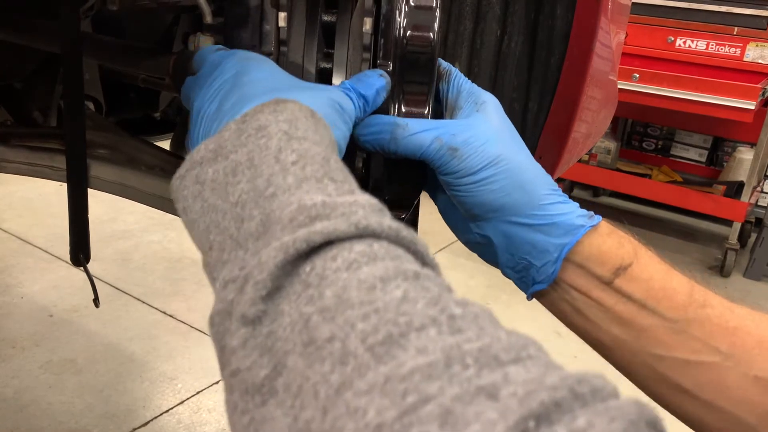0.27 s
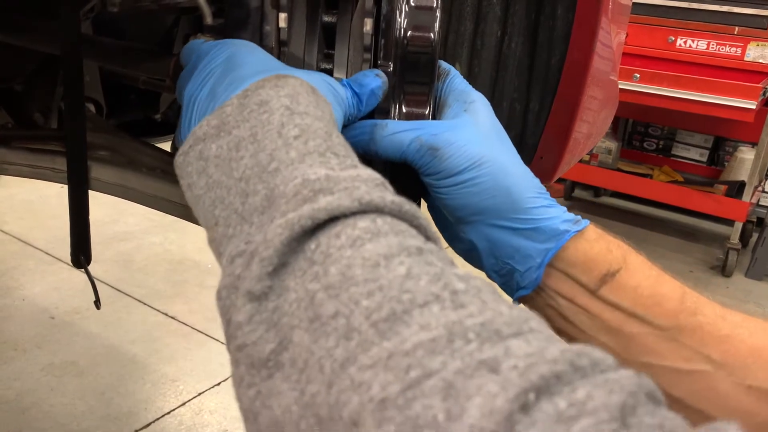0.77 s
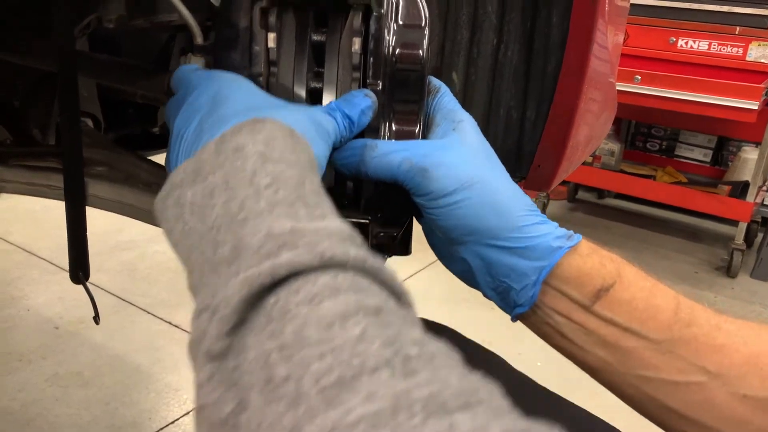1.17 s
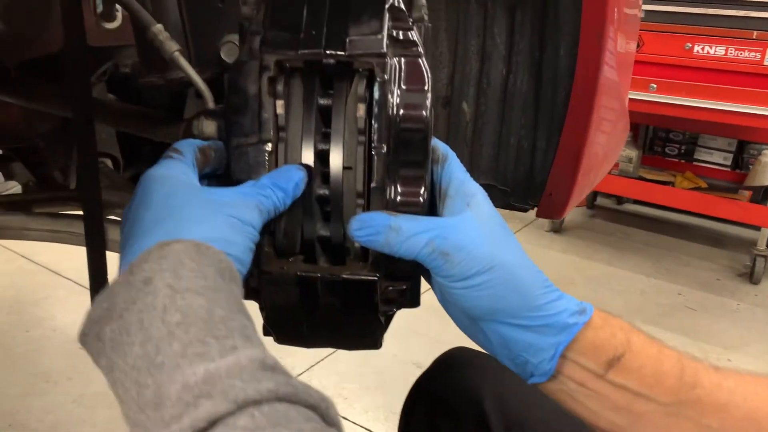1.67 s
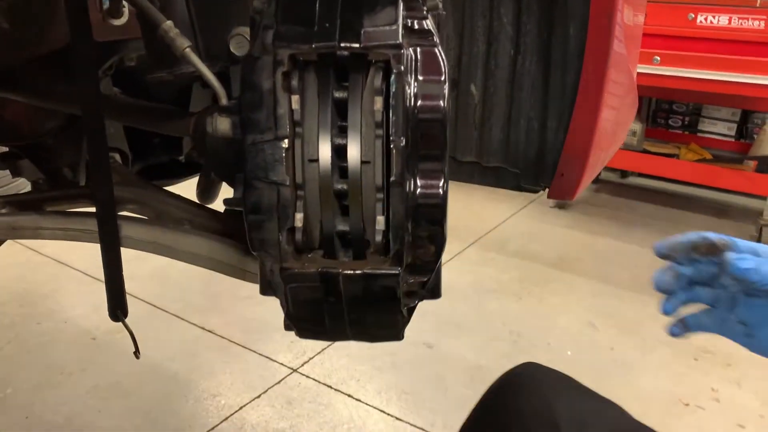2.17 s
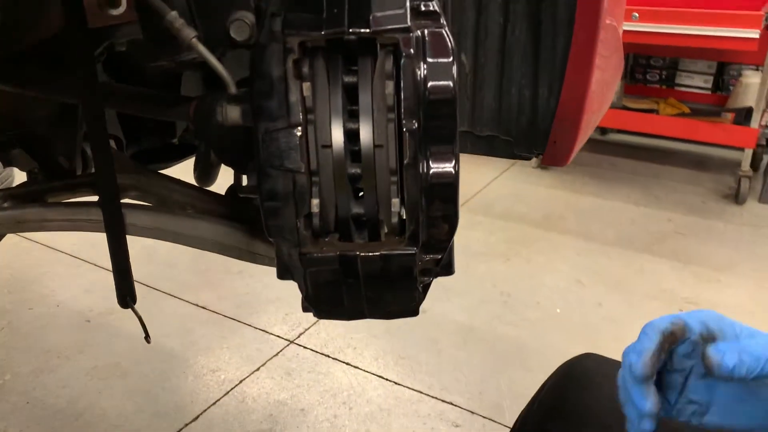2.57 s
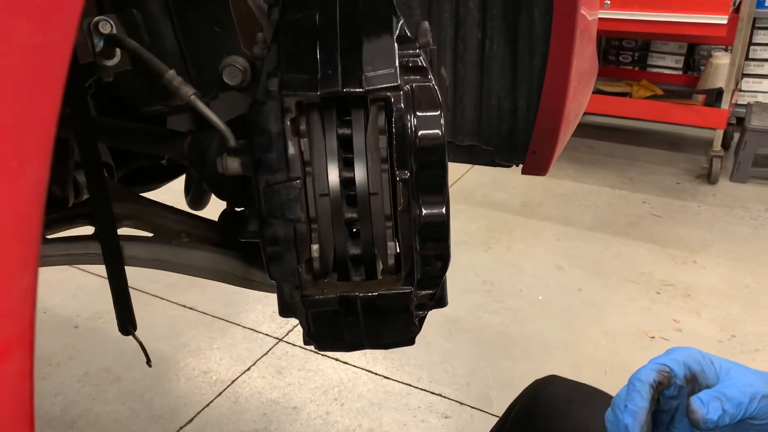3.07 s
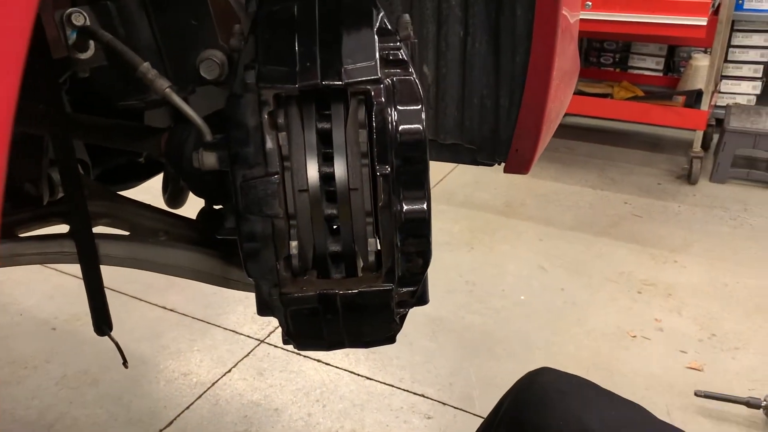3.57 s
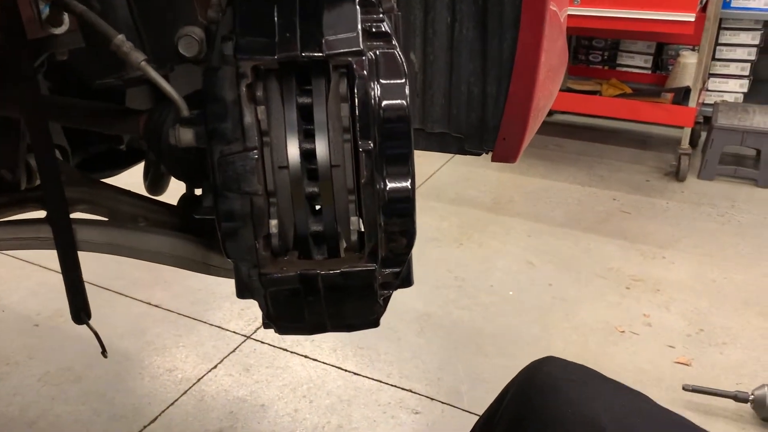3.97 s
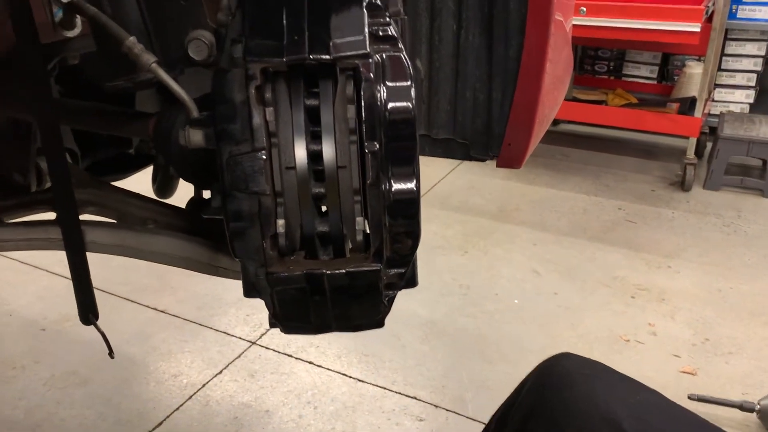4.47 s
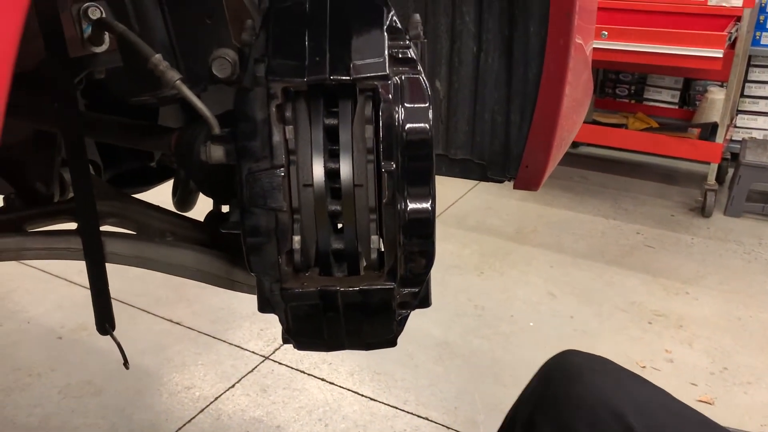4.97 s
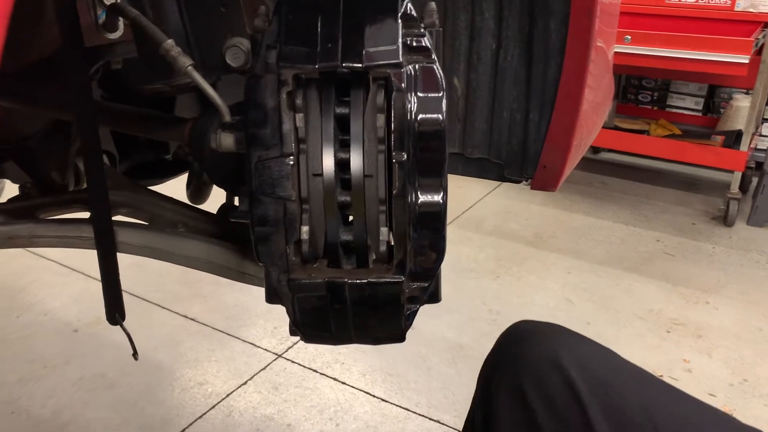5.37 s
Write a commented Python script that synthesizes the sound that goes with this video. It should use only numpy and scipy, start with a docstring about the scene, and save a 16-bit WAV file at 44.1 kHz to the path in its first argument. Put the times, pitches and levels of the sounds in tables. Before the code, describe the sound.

In a quiet, hard-walled garage with low ventilation hum, small spring ticks come first, then rubbery glove rubbing, a brief scrape and a low clunk as a brake pad seats. Clothing rustles and bumps near the microphone; a pin pings loudly, tools knock, a punch clinks, and sharp steel clacks near the end give way to more cloth movement.

```python
"""Brake pads and steel tools in a workshop

Gloved hands rub on brake pads and seat them in a caliper, then handle steel tools and hardware.
Metal parts ping, knock and clink as decaying modes excited by noisy impacts; sliding parts and cloth
are trains of unequal stick-slip contacts, and the body shifts and bumps as muffled noise nearby.
Early echoes and a diffuse tail form the hard-walled room; ventilation is shaped noise with low lines."""
import sys
import numpy as np
from scipy import signal
from scipy.fft import rfft, irfft
from scipy.io import wavfile
from scipy.ndimage import uniform_filter1d, map_coordinates

SR = 44100
rng = np.random.default_rng(int(sys.argv[2]) if len(sys.argv) > 2 else 0)


def dump(signal):
    """Clip the signal to [-1, 1] and save it as 16-bit WAV at the path in sys.argv[1]."""
    limited = np.clip(np.atleast_2d(signal).T, -1, 1)
    pcm = np.round(limited * 32767).astype(np.int16)
    wavfile.write(sys.argv[1], SR, pcm)


N = 247311
T = np.arange(N) / SR  # scene time, s
AGE = T[:SR * 3 // 4]  # time since a contact, s

# modes of a small steel pin [f/Hz, energy/dB, t60/s]
PIN_MODES = [(8090, -21, .04), (8260, -21, .1), (15268, 0, .17), (15370, -6, .16), (15545, -5, .12),
             (15615, -3, .09)]
# impact spectrum of the pin [f/Hz, level/dB]
PIN_CRACK = [(1000, -42), (3200, -20), (6000, -25.5), (8100, 10), (9000, -8), (10500, -3.5), (12200, 1.5),
             (14000, -5), (15600, 2.5), (17000, -40)]
# modes of a tool handle [f/Hz, energy/dB, t60/s]
HANDLE_MODES = [(1500, -3, .03), (1640, 0, .045), (1765, 0, .05), (1910, -2, .08), (2200, -4, .04),
                (2446, -1, .14), (2767, -4, .05), (3130, -4, .05), (3260, -3, .05), (3580, -7, .06),
                (4315, -14, .22), (5800, -15, .24)]
# impact spectrum of the handle [f/Hz, level/dB]
HANDLE_CRACK = [(250, -15), (800, -7), (1200, -7.5), (1600, 2.5), (2300, -4.5), (3200, -4.5), (4000, -9.5),
                (5700, -10), (7400, -28.5), (16000, -78.5)]
# modes of a steel punch [f/Hz, energy/dB, t60/s]
PUNCH_MODES = [(1583, -14, .12), (2444, -15, .12), (3074, -11, .6), (3092, -12, .3), (3592, -9, .06),
               (3780, -10, .06), (3965, -8, .07), (4304, -2, .3), (4996, -18, .25), (6110, -11.5, .27),
               (10860, -11, .11), (11690, -10, .12)]
# impact spectrum of the punch [f/Hz, level/dB]
PUNCH_CRACK = [(250, -13), (600, -8), (1200, -12), (2000, -1), (3300, 3.5), (5000, -1), (8000, -4.5),
               (10000, -7), (12000, 4.5), (14500, -13), (16000, -27)]
# muffled spectrum of body contact [f/Hz, level/dB]
BODY = [(28, -31), (60, -11), (95, 2), (157, -.5), (210, -9.5), (300, -8.5), (500, -10), (780, -13.5),
        (1000, -25.5), (1500, -25.5), (3000, -67)]


def undb(db):
    """Logarithmic level: decibels become an amplitude gain."""
    return 10 ** (np.asarray(db) / 20)


def unit(x):
    """Power normalisation: scale to rms 1."""
    return x / np.sqrt(np.mean(x ** 2))


def unit_energy(x):
    """Energy normalisation: scale the sum of squares to 1."""
    return x / np.sqrt(np.sum(x ** 2))


def colour(x, points, tilt_db=0, size=4096):
    """Minimum-phase filtering through (f/Hz, level/dB) points, tilted by dB per octave."""
    hz, db = np.transpose(points)
    octave = np.log2(np.maximum(np.arange(size // 2 + 1) * SR / size, 1))
    tilted_db = db + tilt_db * np.log2(hz / hz[0])
    gain = undb(np.interp(octave, np.log2(hz), tilted_db))
    # folding the cepstrum onto positive time makes the filter causal
    cepstrum = irfft(np.log(gain))
    cepstrum[1:size // 2] *= 2
    cepstrum[size // 2 + 1:] = 0
    response = irfft(np.exp(rfft(cepstrum)))
    return signal.fftconvolve(x, response)[:len(x)]


def walk(rate):
    """Low-pass random modulation: steps at a rate in Hz, smoothed twice, with a spread near 1."""
    k = int(SR / rate)
    steps = np.repeat(rng.standard_normal(N // k + 1), k)
    return unit(uniform_filter1d(uniform_filter1d(steps, k), k)[:N])


def grains(n, spread_db):
    """Impulsive friction noise: dense tiny contacts of very unequal size."""
    size_db = spread_db * np.minimum(rng.exponential(size=n), 5)
    return unit(rng.standard_normal(n) * undb(size_db))


def add(track, s, sound):
    """Linear superposition: mix a sound in at time s."""
    i = int(s * SR)
    track[i:i + len(sound)] += sound[:N - i]


def peak_at(x, db, size=128):
    """Short-time level: set the loudest 3 ms to db."""
    return x * undb(db) / np.sqrt(uniform_filter1d(x ** 2, size).max())


def fade(t60):
    """Exponential decay: amplitude falls 60 dB in t60 seconds."""
    return np.exp(-np.log(1000) * AGE / max(t60, .001))


def ring(modes):
    """Modal superposition: damped sines whose energy shares vary a little with the contact point."""
    total = 0
    for hz, db, t60 in modes:
        gain = undb(db + rng.normal())
        sine = np.sin(2 * np.pi * hz * AGE + rng.uniform(0, 2 * np.pi))
        total = total + gain * unit_energy(sine * undb(-60 * AGE / t60))
    return unit_energy(total)


def resonance(x, hz, share):
    """Cavity resonance: two equal resonators in cascade steepen the skirts."""
    b, a = signal.iirpeak(hz, 1 / np.clip(share, .03, 1), fs=SR)
    return signal.lfilter(b, a, signal.lfilter(b, a, x))


def waver(x):
    """Varying resonator size: a fold of cloth or rubber changes as it moves, so its pitch wanders."""
    wander = 0.09  # rms share of the playing speed
    return map_coordinates(x, [np.cumsum(1 + wander * walk(25))], order=3, mode="mirror")


def speed(s, rise, fall):
    """Limb kinematics: a limb gathers speed, is fastest (1) at time s and slows again."""
    drop_db, curve = 16, 1.315  # level lost over one rise or fall time; roundness of the crest
    away = np.maximum((s - T) / max(rise, .005), (T - s) / max(fall, .005))
    return undb(-drop_db * np.minimum(away, 10) ** curve)


def blows(rows, modes, crack, ring_db, snap_db, snap_t60, rise_s):
    """Impact excitation: a snap and a chatter of micro-bounces ring the part; harder contact is brighter."""
    out = np.zeros(N)
    for s, db, chatter_t60, *extra in rows:
        own_ring_db, tilt_db = (*extra, 0, 0)[:2]
        envelope = fade(chatter_t60) + undb(snap_db) * fade(snap_t60)
        contact = grains(len(AGE), 1.34) * envelope
        excited = [(hz, level + tilt_db * np.log2(hz / modes[0][0]), t60) for hz, level, t60 in modes]
        impact = unit_energy(colour(contact, crack, tilt_db / 2))
        sound = impact + undb(ring_db + own_ring_db) * ring(excited)
        # a softer contact builds up more slowly
        add(out, s, peak_at(sound * (1 - np.exp(-AGE / rise_s)), db))
    return out


def strokes(rows, spread_db, edge):
    """Stick-slip friction: a sliding part catches unevenly; edge is the share of tapering."""
    out = np.zeros(N)
    for s, length, db in rows:
        n = int(length * SR)
        taper = signal.windows.tukey(n, np.clip(edge, 0, 1))
        add(out, s, undb(db) * grains(n, spread_db) * taper)
    return out * undb(1.15 * walk(180))


def excite(contacts, response):
    """Linear convolution: every contact sets off the response of the part."""
    return signal.fftconvolve(contacts, response)[:N]


def click_through(points):
    """Impulse response: one contact coloured by a spectrum."""
    return unit_energy(colour(signal.unit_impulse(len(AGE)), points))


def ventilation():
    """Broadband flow noise and wavering low lines; the bass is alike in both channels."""
    # air noise spectrum [f/Hz, level/dB]
    air_shape = [(28, -27.5), (45, 6), (100, 0.5), (170, -9.5), (300, -17.5), (600, -30.5), (1500, -35.5),
                 (3000, -41.5), (12000, -38.5), (15700, -38), (17000, -67.5)]
    # low lines [f/Hz, level/dB]
    lines = [(44, -74.5), (59.8, -60.5), (92, -66.5)]
    mid, side = (colour(rng.standard_normal(N), air_shape) for _ in range(2))
    side = colour(side, [(100, -17.5), (300, -3.5), (1500, 4.0), (12000, -12.5)])
    out = (mid + np.outer([1, -1], side)) / np.std(mid) * undb(-58.5)
    for hz, db in lines:
        level = undb(db + 3.9 * walk(3.92))
        phase = 2 * np.pi * hz * T + 0.67 * walk(3.7)
        out = out + level * np.sqrt(2) * np.sin(phase)
    return out


def sleeves():
    """Speed-dependent friction: fibres catch and slip, and faster strokes add treble."""
    # arm sweeps [t/s of fastest motion, rise/s, fall/s, level/dB, treble/dB relative to the body]
    sweeps = [(0.01, 0.16, 0.32, -73, 2), (1.226, 0.051, 0.15, -56.5, -4), (2.22, 0.76, 0.58, -66.5, -8),
              (2.355, 0.062, 0.076, -54.5, 6), (2.409, 0.075, 0.08, -51, 5.5), (2.6, 0.15, 0.4, -69.5, -34),
              (3.58, 1, 0.68, -70, -7), (4.78, 0.086, 0.16, -60, -14), (4.874, 0.18, 0.19, -56.5, 8.5),
              (5.27, 0.74, 0.56, -63.5, -5), (5.487, 0.054, 0.2, -53, -4)]
    # spectra of the swish, body and treble [f/Hz, level/dB]
    cloth = [(250, -18.5), (600, 0.5), (1300, 12), (2700, 4), (4200, 2.5), (5500, -4), (7200, -4),
             (9000, -48.5)]
    cloth_top = [(3000, -10), (4200, 7), (6500, -0.5), (8500, -4.5), (12000, 6.5), (14000, -14), (15500, 2),
                 (17000, -43)]
    treble_power = 1.51  # the treble grows faster with speed than the body
    body, top = (unit(colour(grains(N, 1.8), shape)) for shape in (cloth, cloth_top))
    out = 0
    for s, rise, fall, db, treble_db in sweeps:
        v = speed(s, rise, fall)
        out = out + undb(db) * (body * v + top * undb(treble_db) * v ** treble_power)
    return out * undb(1.9 * walk(60))


def shifts():
    """Muffled friction: the body rubs close to the microphone as it shifts."""
    # shifts of the body [t/s of fastest motion, rise/s, fall/s, level/dB]
    moves = [(0.023, 0.35, 0.24, -54.5), (1.0, 0.29, 1.8, -62.5), (2.199, 0.3, 0.38, -49.5),
             (2.55, 0.093, 0.57, -61), (3.15, 0.23, 0.55, -60), (5.06, 0.22, 0.62, -53),
             (5.33, 0.14, 0.18, -53.5)]
    rub = unit(colour(grains(N, 3.33), BODY)) * undb(1.75 * walk(35))
    return rub * sum(undb(db) * speed(s, rise, fall) for s, rise, fall, db in moves)


def rasps():
    """Resonant friction: clothing drags close by, each stroke through its own hollow resonance."""
    # cloth strokes [t/s of fastest motion, rise/s, fall/s, level/dB, resonance f/Hz]
    drawn = [(0.03, 0.047, 0.05, -54, 223), (1.868, 0.042, 0.035, -52, 380),
             (1.906, 0.018, 0.015, -40, 159), (1.953, 0.031, 0.13, -51.5, 265),
             (1.98, 0.048, 0.16, -53.5, 417), (2.05, 0.066, 0.1, -59.5, 755),
             (2.18, 0.23, 0.093, -53.5, 476), (2.3, 0.091, 0.12, -48, 514), (2.272, 0.05, 0.12, -40, 140),
             (5.09, 0.021, 0.083, -50, 520), (5.254, 0.0083, 0.048, -41, 494)]
    friction = grains(N, 3.0)
    out = 0
    for s, rise, fall, db, hz in drawn:
        hollow = resonance(friction, hz, share=0.39)  # width of each resonator as a share of hz
        out = out + undb(db) * speed(s, rise, fall) * unit(waver(hollow))
    return out


def ticks():
    """Impact on a spring: the pad spring and small hardware tick in short modes."""
    # ticks [t/s, level/dB, chatter t60/s]
    hits = [(0.3095, -56, 0.16), (0.348, -55.5, 0.038), (0.6625, -41, 0.019), (3.631, -65, 0.027),
            (3.7875, -38, 0.0073), (5.478, -41, 0.049)]
    # spring modes [f/Hz, energy/dB, t60/s]
    modes = [(4770, 5, 0.013), (9030, 13, 0.023)]
    # impact spectrum [f/Hz, level/dB]
    crack = [(600, -68), (1300, -7), (2450, -10), (3300, 13), (5000, 5), (8500, 3), (14700, 7),
             (16000, -17)]
    return blows(hits, modes, crack, ring_db=-5.5, snap_db=-8, snap_t60=0.0064, rise_s=0.000089)


def knocks():
    """Modal impact: tools and hardware knock, brighter or duller with contact hardness."""
    # knocks [t/s, level/dB, chatter t60/s, added ring/dB, brightness/dB per octave]
    hits = [(0.347, -55.5, 0.023, -17, -11), (1.608, -55, .007, 8, -0.5), (1.892, -55.5, 0.021, -8, 4),
            (2.817, -46.5, 0.06, 8, -4), (2.869, -49.5, 0.09, 6, 0), (2.987, -54, .05, -2, -12.5),
            (3.014, -42, 0.15, -6.5, -2.5), (3.031, -43.5, 0.13, -9, -1), (3.2235, -39, 0.032, 8, -6.5),
            (3.2275, -32.5, 0.078, 8, -1.5), (3.247, -41.5, 0.046, 4, -4), (3.284, -42, 0.082, -1.5, 7)]
    return blows(hits, HANDLE_MODES, HANDLE_CRACK,
                 ring_db=-3.0, snap_db=-21, snap_t60=0.0031, rise_s=0.00031)


def gloves():
    """Creeping friction: rubber jerks over the pad backs with a dull, wandering rasp."""
    # rubs as the pads are pressed home [start t/s, length/s, level/dB of the jerks]
    rubs = [(0.808, 0.54, -70.5), (1.3, 0.268, -66.5)]
    # rasp spectrum [f/Hz, level/dB]
    shape = [(300, -15), (700, -6), (1150, -1.5), (1500, 3), (2000, -13), (4500, -13.5), (8000, -44)]
    rasp = unit(waver(colour(rng.standard_normal(N), shape)))
    jerks = np.abs(strokes(rubs, spread_db=3.0, edge=0.026))
    return rasp * uniform_filter1d(jerks, size=32)


def skids():
    """Friction-excited modes: the handle skids before and between its knocks."""
    # skids [start t/s, length/s, level/dB of the contacts]
    slides = [(1.045, 0.062, -69.5), (2.82, .075, -70), (3.004, 0.012, -56)]
    handle = click_through(HANDLE_CRACK) + undb(-3.0) * ring(HANDLE_MODES)
    return excite(strokes(slides, spread_db=6.0, edge=0.22), handle)


def clip_scrapes():
    """Friction-excited modes: the pad edge scrapes the steel clip and sets it ringing."""
    # scrapes just before the pad seats [start t/s, length/s, level/dB of the contacts]
    slides = [(1.217, 0.016, -52)]
    # clip modes [f/Hz, energy/dB, t60/s]
    modes = [(4430, 3, 0.055), (4910, 4.5, 0.037), (5550, 1, 0.067)]
    return excite(strokes(slides, spread_db=8.0, edge=0.41), ring(modes))


def clunks():
    """Low modal impact: a pad drops onto its seat in the caliper."""
    # clunks [t/s, level/dB, chatter t60/s]
    hits = [(1.2345, -41.5, 0.017), (1.241, -44, 0.014)]
    # pad modes [f/Hz, energy/dB, t60/s]
    modes = [(210, 3.5, 0.053), (372, -5, 0.061), (637, -7.5, .07), (1237, -5.5, 0.088)]
    # impact spectrum [f/Hz, level/dB]
    crack = [(80, -25), (200, 4), (1000, 1), (2000, -9), (5000, -28), (12000, -28)]
    return blows(hits, modes, crack, ring_db=2.5, snap_db=0, snap_t60=0.0065, rise_s=0.00064)


def scrapes():
    """Granular friction: grit scratches under glove and tool."""
    # scrapes [start t/s, length/s, level/dB of the contacts]
    slides = [(1.765, 0.12, -62), (3.628, 0.076, -58.5), (3.745, 0.16, -57.5), (3.78, 0.046, -42),
              (4.515, 0.066, -60), (4.625, 0.059, -59.5)]
    # grit spectrum [f/Hz, level/dB]
    grit = [(1000, -17.5), (1800, -7), (2400, 0), (4000, -1.5), (6500, 0), (8500, -1), (12000, 8),
            (15500, 3), (17000, -54)]
    return excite(strokes(slides, spread_db=5.5, edge=0.35), click_through(grit))


def bumps():
    """Damped soft impact: hands and body bump as decaying muffled noise."""
    # bumps [t/s, level/dB, t60/s, brightness/dB per octave]
    hits = [(1.938, -37, 0.14, -3), (2.176, -41.5, 0.055, -0.5), (4.31, -47.5, 0.4, 2.5),
            (5.018, -38.5, 0.06, -5.5), (5.14, -43.5, 0.074, -1.5), (5.249, -35.5, 0.084, 0)]
    out = np.zeros(N)
    for s, db, t60, tilt_db in hits:
        contact = grains(len(AGE), 3.6) * fade(t60)
        add(out, s, peak_at(colour(contact, BODY, tilt_db), db))
    return out


def weave():
    """Stick-slip of threads: coarse cloth drags over itself, its threads catching one by one."""
    # chafes [start t/s, length/s, level/dB of the contacts]
    chafes = [(2.32, 0.18, -56), (4.72, .2, -64), (5.44, 0.175, -56.5)]
    # spectrum of one thread [f/Hz, level/dB]
    thread = [(700, -19), (1500, 6), (1850, -4), (2300, 5.5), (4200, -2.5), (6000, -17), (17000, -22)]
    return excite(strokes(chafes, spread_db=6.0, edge=0.43), click_through(thread))


def pings():
    """High modal impact: a small steel pin is tapped and rings."""
    # taps [t/s, level/dB, chatter t60/s, added ring/dB]
    hits = [(2.774, -36.5, 0.01, -7), (2.872, -55, 0.025, -5), (3.0165, -25.5, 0.027, -1),
            (3.0205, -22.5, .02, 28)]
    return blows(hits, PIN_MODES, PIN_CRACK, ring_db=-3, snap_db=24.5, snap_t60=0.0086, rise_s=0.00054)


def drags():
    """Friction-excited modes: the dragged punch rings."""
    # drags [start t/s, length/s, level/dB of the contacts]
    slides = [(4.214, 0.047, -43.5)]
    punch = click_through(PUNCH_CRACK) + undb(-4.0) * ring(PUNCH_MODES)
    return excite(strokes(slides, spread_db=4.0, edge=0.15), punch)


def clinks():
    """Repeated modal impact: a steel punch strikes concrete and rattles."""
    # strikes [t/s, level/dB, chatter t60/s, added ring/dB]
    hits = [(4.2165, -43, 0.015, -6), (4.2245, -35, 0.05, -11), (4.237, -33, 0.013, 0),
            (4.254, -34.5, 0.012, 3.5), (4.2835, -28, 0.038, -4.5), (4.294, -37.5, 0.28, 4.5),
            (5.184, -39.5, 0.065, -23)]
    return blows(hits, PUNCH_MODES, PUNCH_CRACK,
                 ring_db=-3, snap_db=14.5, snap_t60=0.0039, rise_s=0.00035)


def snaps():
    """Contact-dominated impact: the pin snaps home, dry and sharp, with little ringing."""
    # snaps [t/s, level/dB, chatter t60/s]
    hits = [(4.414, -53, .01), (4.893, -27, .014), (4.9065, -15.5, .024)]
    return blows(hits, PIN_MODES, PIN_CRACK, ring_db=-19, snap_db=13, snap_t60=.004, rise_s=.0002)


def clacks():
    """Hard modal impact: steel clacks against steel in the hands."""
    # clacks [t/s, level/dB, chatter t60/s]
    hits = [(4.9678, -20.5, 0.041), (4.983, -20, 0.026), (4.9875, -22, 0.014)]
    # steel modes [f/Hz, energy/dB, t60/s]
    modes = [(2080, -13, .018), (4000, -12, .015), (4920, -13, .07), (8075, -10, .025), (10850, -4, .08),
             (11686, 2, .08), (15350, -11, .08)]
    # impact spectrum [f/Hz, level/dB]
    crack = [(300, -13.5), (1200, -15), (2100, -4), (3000, -9.5), (4500, -5), (8000, -1), (9500, -7.5),
             (10800, 7.5), (11250, -10), (11700, 21), (12300, -4), (13500, 3), (16000, -19)]
    return blows(hits, modes, crack, ring_db=-5.0, snap_db=-15, snap_t60=0.0083, rise_s=0.000099)


def room_tail():
    """Diffuse reverberation: decaying noise bands, shorter and weaker in the upper treble."""
    # room bands [f/Hz, t60/s, level/dB]
    bands = [(154, 0.72, 2.5), (511, 0.55, 4), (1550, 0.75, -9.5), (3530, 0.57, -9), (7600, 0.49, -15.5),
             (12500, 0.34, -23.5)]
    centres = np.log([row[0] for row in bands])
    log_hz = np.log(np.maximum(np.linspace(0, SR / 2, len(AGE) // 2 + 1), 1))
    noise = rfft(rng.standard_normal(len(AGE)))
    tail = 0
    for share, (_, t60, db) in zip(np.eye(len(bands)), bands):
        band = irfft(noise * np.interp(log_hz, centres, share), len(AGE))
        envelope = unit_energy(fade(t60) * (1 - np.exp(-AGE / 0.0074)))
        tail = tail + undb(db) * band * envelope
    return tail


def place(x, near_db, room_db):
    """Early and late reflection: floor and wheel arch answer, then the workshop, as mid and side echoes."""
    echoes = []
    for _ in range(2):
        near = unit_energy(grains(len(AGE), 1.53) * fade(0.056) * (1 - np.exp(-AGE / 0.00074)))
        near = colour(near, [(100, -2.0), (500, -1.0), (3000, -3.5), (8000, -5.0), (15000, -13.5)])
        echoes.append(excite(x, undb(near_db) * near + undb(room_db) * room_tail()))
    # the side echo is weak in the bass
    side = colour(echoes[1], [(100, -16.0), (400, -1.5), (2000, 3), (5000, 4), (14000, 8.5)])
    return x + echoes[0] + np.outer([1, -1], side)


def ports(pair, lag_s):
    """Interaural-style delay: sound from the right reaches the left port a little later."""
    delay = np.exp(-2j * np.pi * np.fft.rfftfreq(N, 1 / SR) * lag_s)
    late = irfft(rfft(pair[0]) * delay, N)
    return np.array([late, pair[1]])


def scene():
    """Superposition in a room: some sources straight ahead, some delayed as from the right."""
    ahead = (place(pings(), near_db=2.5, room_db=3)
             + place(knocks(), near_db=-1.0, room_db=1.0)
             + place(clinks() + scrapes() + drags() + skids(), near_db=3.0, room_db=2.5)
             + place(sleeves() + weave(), near_db=-1.0, room_db=-1.0)
             + place(clip_scrapes() + clunks(), near_db=0.5, room_db=-3.5)
             + place(gloves(), near_db=3.5, room_db=4.5))
    body_pan_db = 1.9  # the body is this much louder on the right
    body_gains = undb(np.array([[-body_pan_db], [body_pan_db]]) / 2)
    movement = shifts() + rasps() + bumps()
    right = (place(ticks(), near_db=-3.0, room_db=-5.0)
             + place(snaps(), near_db=-22, room_db=-14.0)
             + place(clacks(), near_db=-2.0, room_db=-6.0)
             + place(movement, near_db=-4.5, room_db=-12.5) * body_gains
             + ventilation())
    return ahead + ports(right, lag_s=.000188)


def record(dry):
    """Transducer response: the microphone ports notch the treble; the recorder cuts above 16.7 kHz."""
    # response with the ports' two treble notches [f/Hz, level/dB]
    mic = [(7600, -1), (8200, -4), (8650, -19), (9400, 1), (12600, -5), (13500, -10), (14800, 1)]
    heard = [colour(channel, mic) for channel in dry]
    top_cut = signal.ellip(8, .2, 70, 16700, fs=SR, output="sos")
    return signal.sosfilt(top_cut, heard)


dry = scene()
out = record(dry)
dump(out)
```